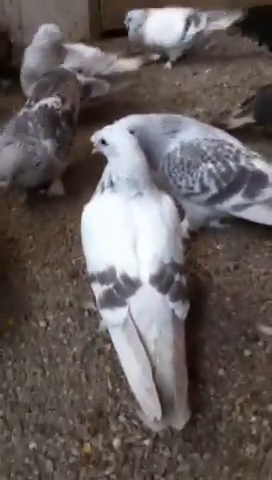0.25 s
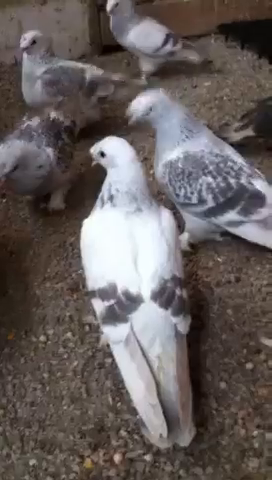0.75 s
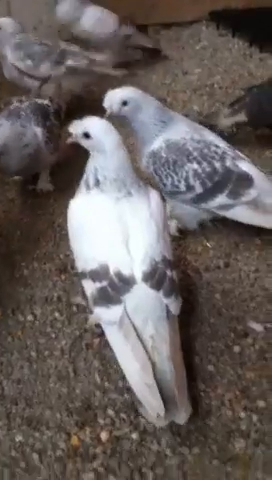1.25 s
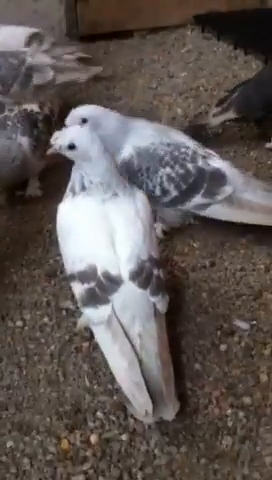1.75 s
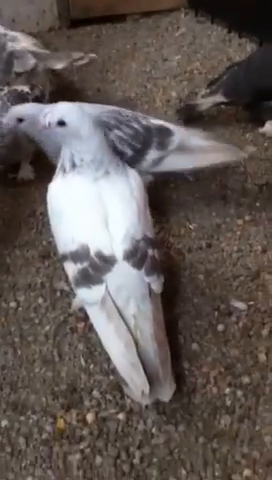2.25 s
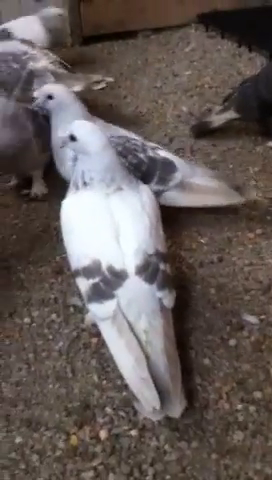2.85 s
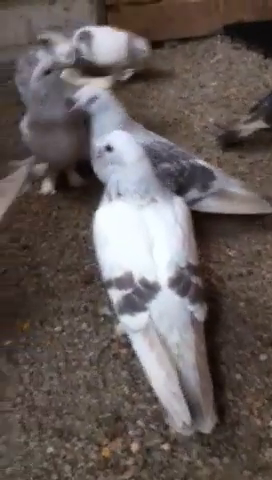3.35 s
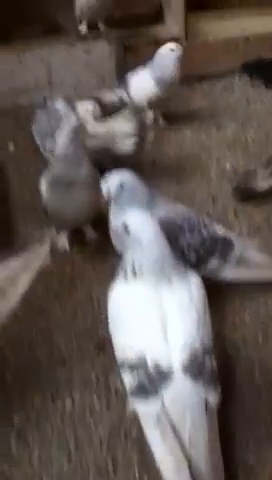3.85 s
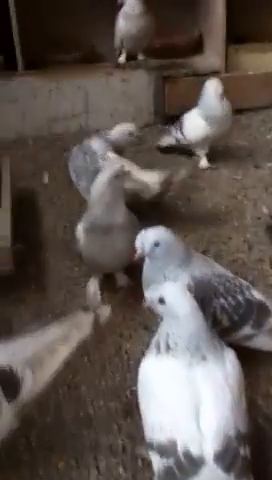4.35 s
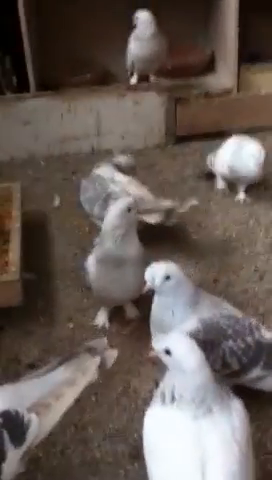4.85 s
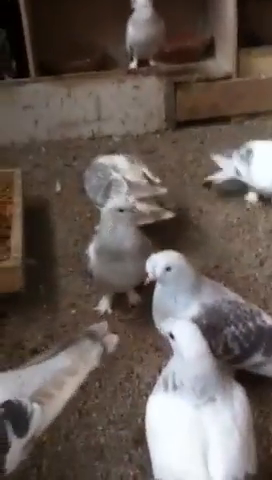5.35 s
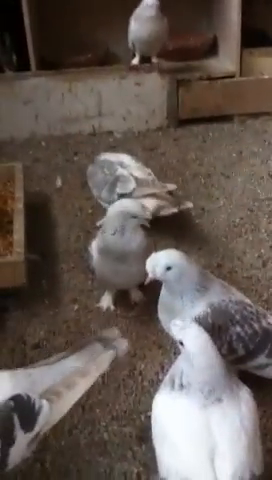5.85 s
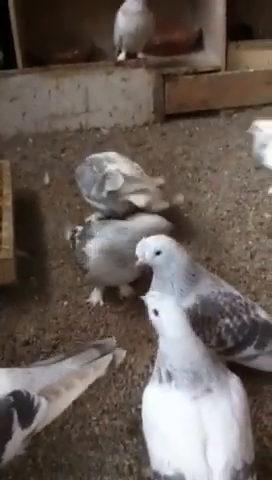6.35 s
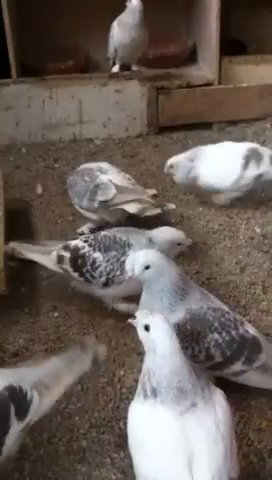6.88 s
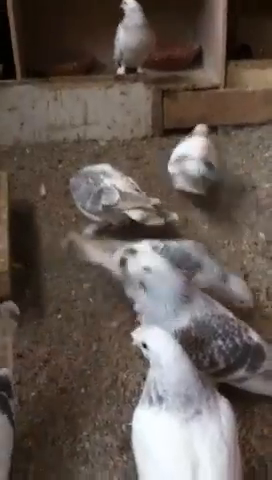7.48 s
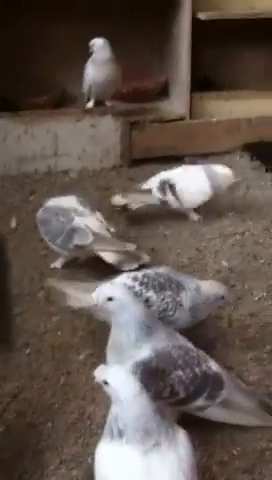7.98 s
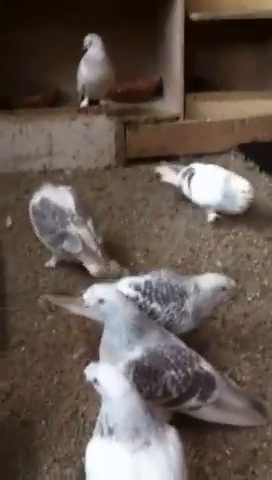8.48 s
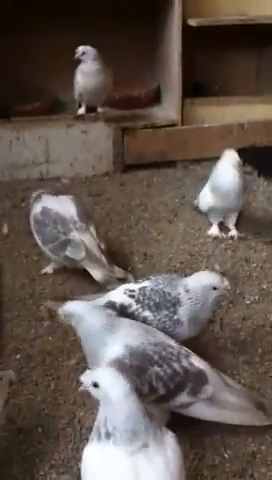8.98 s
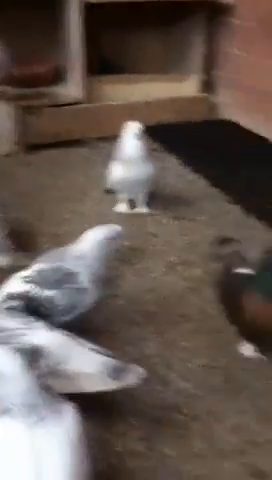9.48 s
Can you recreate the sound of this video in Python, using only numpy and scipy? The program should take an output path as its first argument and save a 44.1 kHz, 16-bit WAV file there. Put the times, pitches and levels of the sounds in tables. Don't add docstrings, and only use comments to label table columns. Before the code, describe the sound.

A quick volley of loud wing claps interrupts throaty pigeon cooing, which returns in rattling rolls over faint litter scuffs and dull air hum.

```python
import sys
import numpy as np
from scipy import signal
from scipy.fft import rfft, irfft
from scipy.io import wavfile
from scipy.ndimage import uniform_filter1d, minimum_filter1d

SR = 44100
rng = np.random.default_rng(int(sys.argv[2]) if len(sys.argv) > 2 else 0)


def gain_from_db(level_db):
    decades = np.asarray(level_db, float) / 20
    return 10 ** decades


def dump_mix(stems):
    frames = np.atleast_2d(stems).T
    limited = np.clip(frames, -1, 1)
    pcm = np.round(limited * 32767).astype(np.int16)
    wavfile.write(sys.argv[1], SR, pcm)


N = 428652

# [f/Hz, level/dB per Hz]
LITTER_COLOUR = [(100, -24), (250, -1.5), (1000, -2), (3600, -3), (5400, -4), (9400, -9.5), (16000, -22.5)]
FALL_S = 0.014


def evened(x):
    return x / np.sqrt(np.mean(x ** 2) + 1e-20)


def read(points, hz):
    f, value = np.transpose(points)
    return np.interp(np.log(hz + 1), np.log(f + 1), value)


def along(rows):
    s, *columns = np.transpose(rows)
    return [np.interp(np.arange(N) / SR, s, column) for column in columns]


def during(tables, fade):
    t = np.arange(N) / SR
    total = np.zeros(N)
    for rows in tables:
        start, end = rows[0][0], rows[-1][0]
        total += np.interp(t, [start - fade, start, end, end + fade], [0, 1, 1, 0])
    return total.clip(0, 1)


def add(mix, s, sound):
    part = mix[max(round(s * SR), 0):][:len(sound)]
    part += sound[:len(part)]


def wobble(count, hz):
    b, a = signal.butter(2, hz, fs=SR)
    drift = signal.lfilter(b, a, rng.standard_normal(count + 4000))
    return evened(drift[4000:])


def coloured(points, count, tilt_db=0, lumps_db=0):
    hz = np.fft.rfftfreq(count, 1 / SR)
    gain = gain_from_db(read(points, hz) + tilt_db * np.log2((hz + 700) / 5000))
    lumps = evened(uniform_filter1d(rng.standard_normal(len(hz)), size=25))
    spectrum = rfft(rng.standard_normal(count)) * gain * gain_from_db(lumps_db * lumps)
    return evened(irfft(spectrum, count))


def resonate(x, hz, width):
    b, a = signal.iirpeak(hz, hz / width, SR)
    return signal.lfilter(b, a, signal.lfilter(b, a, x))


def swelling(length, rise=.3):
    u = np.arange(round(2 * abs(length) * SR) + 8) / (rise * abs(length) * SR + 4)
    return u ** 2 * np.exp(2 - 2 * u)


def burst(length, clumps_db, rise):
    t = np.arange(round(.15 * SR)) / SR
    start = (1 - np.exp(-t / abs(rise))) ** 2
    return start * np.exp(-t / abs(length)) * gain_from_db(clumps_db * wobble(len(t), 500))


def loft(x, wet_db):
    # [f/Hz, time to fall 60 dB/s]
    echo_times = [(150, 0.33), (400, 0.32), (1000, 0.22), (2800, 0.16), (7300, 0.12), (15000, 0.054)]
    taps = np.zeros(SR // 2)
    at = np.arange(100, SR // 2 - 20, 20)
    taps[at + rng.integers(0, 20, len(at))] = rng.choice([-1., 1.], len(at))
    hz, t, z = signal.stft(taps, SR, nperseg=256)
    fading = gain_from_db(-60 * t / read(echo_times, hz)[:, None])
    tail = signal.istft(z * fading, SR, nperseg=256)[1]
    return x + gain_from_db(wet_db) * signal.fftconvolve(x, tail / np.linalg.norm(tail))[:N]


def air():
    # [f/Hz, level/dB per Hz]
    air_colour = [(20, -25.5), (70, -21.5), (141, 0.5), (230, -3), (500, -8), (1000, -7), (1650, -16),
                  (2100, -23), (6200, -28.5), (15600, -30.5), (16600, -50.5)]
    # [t/s, level/dB]
    stirring = [
        [(0.0, -68), (0.208, -62), (0.4, -58)],
        [(1.3, -52.5), (1.61, -63.5), (1.86, -72), (3.27, -66.5), (5.0, -74.5)],
        [(5.1, -59), (5.13, -67), (6.98, -71), (7.73, -61.5), (7.89, -68.5), (9.2, -77.5)],
        [(9.25, -64.5), (9.482, -67.5), (9.72, -67)],
    ]
    rustle_db = along(np.concatenate(stirring))[0] - 0.5 + 2.6 * wobble(N, 40)
    rustle = gain_from_db(rustle_db) * coloured(LITTER_COLOUR, N)
    return gain_from_db(-57 + .9 * wobble(N, 3.9)) * coloured(air_colour, N) + rustle


def litter():
    # [t/s, peak level/dB, treble tilt/dB per octave, length/s]
    scuffs = [(0.1903, -40, 6, 0.011), (1.656, -43.5, -4.5, 0.0101), (1.995, -50.5, 7, 0.0105),
              (2.216, -46, 1.5, 0.0239), (2.4029, -37.5, -10.5, 0.015), (2.5794, -48.5, 7.5, 0.0246),
              (2.729, -43, -0.5, 0.042), (2.835, -48.5, 1.5, 0.012), (3.122, -44.5, 11, 0.009),
              (3.82, -42, 17, 0.0097), (4.0209, -45.5, 5, 0.0159), (4.311, -44.5, 0, 0.02),
              (4.595, -38, 4.5, 0.014), (5.306, -42.5, 3, 0.0205), (5.347, -41, 1, 0.01),
              (6.2597, -34, 3.5, 0.022), (6.482, -47.5, 0.5, 0.02027), (6.592, -31.5, -0.5, 0.0138),
              (7.018, -45.5, 2, 0.025), (7.237, -32.5, -2, 0.0076), (7.262, -41, 2, 0.029),
              (7.333, -42.5, -2, 0.014), (7.523, -39, 1, 0.017), (7.634, -36.5, 0.5, 0.01155),
              (7.699, -41.5, 2.5, 0.032), (8.645, -48.5, 12.5, 0.0191), (5.5545, -34.5, -1, 0.0036),
              (9.277, -36, -3, 0.043), (9.35, -49, 1, 0.18), (9.665, -21.5, 16.5, 0.0046),
              (1.7394, -54.5, -1.5, 0.0061), (4.459, -51, 11.5, 0.0057), (4.506, -44.5, 0, 0.0092),
             (4.691, -53, 0, 0.008), (4.98, -49, 6, 0.008), (5.068, -56, 5, 0.008),
             (5.184, -42, 2.5, 0.0091), (5.474, -52.5, 5.5, 0.0058), (6.4, -47.5, 6.5, 0.0083),
             (7.005, -46.5, 0.5, 0.0074), (8.8184, -52, 1, 0.0083), (9.396, -45, 0, 0.0094),
             (9.564, -49.5, 2, 0.0079)]
    # [t/s, peak level/dB]
    pecks = [(1.4377, -35), (1.467, -41), (1.5275, -40), (1.956, -54), (2.1929, -44), (2.2248, -50),
             (2.913, -49), (3.172, -44), (5.095, -50), (5.1367, -45), (5.3064, -54)]
    # [f/Hz, level/dB, time to fall 60 dB/s]
    feeder = [(2400, -8, .008), (2900, -8, .008), (4250, -4, .007), (5500, -8, .005), (8200, -12, .004)]
    out = np.zeros(N)
    for s, db, tilt_db, length in scuffs:
        shape = burst(length, clumps_db=5.5, rise=0.028 * length)
        add(out, s - .001, gain_from_db(db - 14.5) * shape * coloured(LITTER_COLOUR, len(shape), tilt_db))
    t = np.arange(2000) / SR
    ring = sum(gain_from_db(db - 60 * t / t60) * np.sin(2 * np.pi * hz * t) for hz, db, t60 in feeder)
    for s, db in pecks:
        knock = evened(rng.standard_normal(300)) * np.exp(-t[:300] / 0.0054)
        add(out, s, gain_from_db(db - 18.5) * np.convolve(knock, ring))
    return out


def puffs():
    # [t/s, level/dB, centre f/Hz, length/s]
    brushes = [(2.092, -57, 77, .046), (6.595, -51, 1300, .006), (5.065, -61, 4000, .085),
               (5.22, -66, 4200, .04), (2.74, -54, 160, .076), (.99, -50, 180, .04), (5.26, -60, 157, .1),
               (5.888, -55, 1300, .012), (5.925, -60, 1550, .06), (9.3, -55, 400, .05),
               (9.362, -54, 1030, .03)]
    out = np.zeros(N)
    for s, db, hz, length in brushes:
        shape = swelling(length, rise=0.7)
        hiss = resonate(rng.standard_normal(len(shape)), hz, 0.29 * hz)
        add(out, s, gain_from_db(db + 3.6 * wobble(len(shape), 34)) * shape * evened(hiss))
    return out


def feather_hiss():
    # [t/s, level/dB]
    strength = [(.415, -47), (.425, -38), (.52, -44.5), (.8, -33.5), (1.2, -39), (1.3, -42.5), (1.45, -95)]
    # [f/Hz, level/dB per Hz]
    hiss_colour = [(59, -53.5), (100, -22), (353, -5.5), (714, -10.5), (903, -8), (1510, -17.5),
                   (14500, -26), (16500, -45.5)]
    hiss = gain_from_db(along(strength)[0] + 3.3 * wobble(N, 30)) * coloured(hiss_colour, N)
    return hiss * during([strength], fade=0.0084)


def wing_claps():
    # [t/s, peak level/dB, length of the slap/s, treble tilt/dB per octave]
    claps = [
        (0.534, -1, 0.014, 0),
        (0.649, -2, 0.012, -1.5),
        (0.7597, 0.5, 0.01268, 0),
        (0.8753, -3, 0.01, 0),
        (0.9457, -22.5, 0.0065, 1),
        (0.992, 1, 0.011, 0.5),
        (1.1125, -2, 0.0091, 2),
        (1.2375, -4, 0.0088, 0.5),
    ]
    # [f/Hz, level/dB per Hz]
    clap_colour = [(24, -35), (40, -16), (160, -28), (308, -4.5), (497, -5.5), (624, -5), (3290, -5),
                   (4800, -7.5), (13200, -13), (15300, -16), (16500, -49.5)]
    # [f/Hz, width/Hz, level/dB]
    boards = [(310, 40, -6), (490, 24, 5), (640, 40, -10), (855, 35, -4), (1100, 40, -3), (1380, 45, -4),
              (1890, 50, -3), (2370, 60, -6), (3160, 70, -4)]
    out = np.zeros(N)
    b, a = signal.butter(1, 110, "high", fs=SR)
    for s, db, length, tilt_db in claps:
        shape = burst(length, clumps_db=3, rise=.28 * length)
        slap = shape * coloured(clap_colour, len(shape), tilt_db, lumps_db=0.07)
        add(out, s - .002, gain_from_db(db - 24.5) * evened(signal.lfilter(b, a, slap)))
        push = swelling(0.031, rise=0.64)
        puff = evened(resonate(rng.standard_normal(len(push)), 317.4, 180))
        add(out, s - .018, gain_from_db(db - 35.0) * push * puff)
    return out + sum(gain_from_db(db) * resonate(out, hz, width) for hz, width, db in boards)


def blips(rows, start, rough, length=0):
    out = np.zeros(N)
    for s, db, hz, *own_length in rows:
        own = sum(own_length)
        span = length + own
        u = np.arange(round(2 * span * SR)) / (span * SR)
        shape = 1.8 * u ** 0.5 * np.exp(-(1.133 * u) ** 2.0)
        glide = 1 + (start - 1) * np.exp(-u / 0.19)
        turns = np.cumsum(hz * glide * (1 + rough * wobble(len(u), 106))) / SR
        strength = gain_from_db(db - 1.0 + 7.5 * rough * wobble(len(u), 79))
        add(out, s - .006 - 0.0406 * own, strength * shape * np.sin(2 * np.pi * turns))
    return out


def gulps():
    # [t/s, peak level/dB]
    gulp_times = [(1.844, -40.5), (2.114, -38.5), (2.226, -41.5), (2.335, -41), (2.683, -37), (3.14, -43.5),
                  (3.252, -35.5), (3.281, -37), (3.407, -44.5), (5.56, -44), (5.722, -44), (5.883, -42.5),
                  (6.862, -44.5), (7.046, -41), (7.111, -40.5), (7.783, -46.5), (8.085, -47.5),
                  (8.321, -40.5), (7.815, -53), (7.885, -43), (7.92, -43), (7.95, -46), (5.94, -57),
                  (5.97, -51), (5.999, -54), (3.17, -40), (3.306, -35)]
    return blips([(s, db, 228.7) for s, db in gulp_times], start=1.064, rough=0.041, length=0.032)


def bubbles():
    # [t/s, peak level/dB, f/Hz]
    bubble_notes = [(1.862, -38.5, 412.7), (3.076, -33, 403), (3.192, -32.5, 361.5), (5.232, -49.5, 375.5),
                    (5.292, -35.5, 356.2), (5.559, -32, 392), (5.58, -32, 353.5), (5.675, -36, 361),
                    (5.727, -34, 398), (5.823, -40, 422), (5.859, -35, 402), (5.895, -29.5, 434),
                    (6.029, -32.5, 366), (6.072, -31, 385), (6.54, -35, 399.6), (6.745, -36, 399.7),
                    (6.815, -40.5, 396), (6.863, -28.5, 375.6), (6.909, -37.5, 384), (6.99, -34, 356),
                    (7.036, -30.5, 370.6), (7.078, -31.5, 374.6), (7.102, -34.5, 406.4),
                    (7.928, -39.5, 372.5), (7.962, -44, 365.7), (5.325, -39.5, 355.7), (5.595, -38, 385),
                    (5.92, -33, 425), (5.44, -44, 399), (8.083, -28.5, 379), (8.196, -34, 370.8),
                    (8.252, -31.5, 386), (8.315, -30.5, 382.5), (8.346, -38.5, 419)]
    # [t/s, peak level/dB]
    low_bubbles = [(0.047, -34), (2.007, -38), (2.779, -40), (2.97, -35), (3.11, -36.5), (3.41, -33.5),
                   (6.121, -28), (6.643, -33.5), (6.679, -32.5), (7.883, -36), (7.95, -50), (7.99, -47),
                   (8.029, -39), (6.02, -31.5), (6.535, -40.5), (6.76, -44), (6.919, -40), (7.14, -36.5),
                   (7.795, -41), (8.062, -36), (8.457, -28)]
    rows = bubble_notes + [(s, db, 319) for s, db in low_bubbles]
    return blips(rows, start=0.99, rough=0.052, length=0.031)


def whoops():
    # [t/s, peak level/dB, end f/Hz, length/s]
    whoop_notes = [(0.044, -32.5, 540, 0.034), (1.891, -42.5, 623, 0.031), (2.23, -37, 530.5, 0.031),
                   (2.344, -34, 491, 0.04), (2.745, -40.5, 513.3, 0.077), (2.76, -43, 624, 0.064),
                   (2.968, -41.5, 527, 0.052), (3.119, -39, 550.8, 0.045), (3.375, -40.5, 569.6, 0.058),
                   (3.58, -42.5, 567.6, 0.045), (5.24, -50.5, 623.6, 0.039), (5.618, -37.5, 628.4, 0.052),
                   (5.769, -42, 652, 0.048), (6.589, -34, 622.7, 0.038), (6.913, -42, 562, 0.03),
                   (7.776, -38, 504.7, 0.04), (7.825, -33, 600, 0.0224), (8.133, -41.5, 626.5, 0.035),
                   (1.481, -42, 744.4, 0.04), (2.385, -42, 825, 0.057), (2.81, -35, 623.6, 0.024),
                   (6.56, -39.5, 530.1, 0.04), (5.6, -45, 533, 0.0385), (2.678, -44.5, 766, 0.047),
                   (3.143, -41, 686, 0.043)]
    return blips(whoop_notes, start=0.869, rough=0.07)


def roll():
    # [t/s, level/dB]
    bouts = [
        [(0.0, -41.5), (0.308, -35.5), (0.5, -37.5)],
        [(1.4, -66), (1.53, -55), (2.55, -35.5), (2.74, -44), (2.99, -48), (3.5, -41.5)],
        [(5.2, -58.5), (5.39, -54), (6.27, -37.5), (6.65, -46.5), (6.95, -47.5), (7.2, -45)],
        [(7.7, -53.5), (7.912, -49), (8.5, -42.5)],
    ]
    # [f/Hz, width/Hz, level/dB]
    crop = [(219, 48, -5), (312.5, 23, -0.5), (385, 84, -1.5), (470, 66, -4.5), (544, 92, -12)]
    pulse_hz = 95 * gain_from_db(4 * wobble(N + 1, 60))
    pulses = np.diff(np.floor(np.cumsum(pulse_hz) / SR)) * gain_from_db(3 * rng.standard_normal(N))
    rattle = np.zeros(N)
    for k, (hz, width, db) in enumerate(crop):
        rattle += (-1) ** k * gain_from_db(db) * resonate(pulses, hz, width)
    held = uniform_filter1d(effort()[1], 800)
    held_db = np.clip(20 * np.log10(held.clip(1e-6)) + 46, 0, 12)
    strength = gain_from_db(along(np.concatenate(bouts))[0] - 1.5 - 0.76 * held_db)
    return strength * during(bouts, fade=0.038) * evened(rattle)


def note(length, db, grow_db):
    t = np.arange(round((length + FALL_S) * SR)) / SR
    ends = np.clip(np.minimum(t / .014, (length - t) / FALL_S + 1), 0, 1)
    return ends * gain_from_db(db + grow_db * (t / length - 1.5))


def effort():
    # [start t/s, length/s, first f/Hz, last f/Hz, level/dB]
    hoots = [(0, 0.038, 434.4, 453, -40.5), (1.956, 0.087, 442.3, 440.4, -45.5),
             (2.148, 0.1706, 455.3, 424.2, -37.5), (2.951, 0.096, 407.2, 400, -45),
             (3.08, 0.049, 400, 405.4, -40), (6.69, 0.129, 400, 395, -45.5), (6.89, .05, 400, 398.7, -41),
             (3.269, 0.12, 392.6, 409, -40), (5.238, 0.119, 364.2, 355, -45),
             (5.39, 0.1493, 392.5, 366.6, -47.5), (5.961, 0.045, 435.6, 429.6, -33),
             (6.032, 0.085, 392, 394.8, -44), (7.898, 0.078, 364, 368.1, -43),
             (8.187, 0.15, 371.2, 402, -41)]
    # [t/s, f/Hz, level/dB]
    early_coos = [
        [(0.062, 401, -41), (0.092, 407.4, -36), (0.168, 401.4, -31.5), (0.234, 405.4, -42), (0.25, 403, -29.5),
         (0.262, 393, -50)],
        [(0.268, 430.2, -54), (0.28, 407, -33), (0.294, 407, -29), (0.314, 410, -39), (0.342, 406.3, -27),
         (0.37, 389.4, -49)],
        [(2.37, 417, -43), (2.372, 410.4, -50), (2.388, 412.5, -35.5), (2.466, 409.9, -36.5), (2.5, 416, -39),
         (2.526, 425.2, -37.5), (2.535, 434.5, -41)],
        [(2.54, 440.6, -39.5), (2.566, 436.7, -33), (2.6, 405.6, -31), (2.612, 404, -26.5), (2.64, 403, -37),
         (2.652, 395, -26.5), (2.68, 423, -36), (2.72, 403, -33), (2.73, 410, -50)],
        [(3.445, 379, -45), (3.477, 399, -40.5), (3.491, 391.8, -48), (3.513, 404, -41), (3.531, 395, -47.5),
         (3.567, 392, -38), (3.589, 376, -37), (3.615, 369.3, -40)],
    ]
    # [t/s, f/Hz, level/dB]
    late_coos = [
        [(6.145, 371, -42), (6.185, 371.3, -32.5), (6.235, 374, -33.5), (6.249, 376, -33), (6.275, 402.8, -41)],
        [(7.12, 393, -58), (7.144, 391.9, -35), (7.196, 395.7, -42), (7.218, 395, -36.5), (7.24, 390.8, -48),
         (7.245, 392, -58)],
        [(7.25, 381.6, -47), (7.262, 385.1, -33), (7.276, 384, -29), (7.292, 369, -39.5), (7.312, 369.3, -33),
         (7.38, 365, -33.5), (7.392, 382, -30.5), (7.405, 403, -46)],
        [(8.39, 392, -54), (8.436, 393, -36), (8.45, 387, -38.5), (8.504, 372, -34), (8.518, 349.5, -33),
         (8.548, 350, -46.5)],
        [(8.552, 361, -43.5), (8.58, 361.2, -34), (8.612, 374, -33), (8.62, 370.4, -47)],
        [(8.625, 414.8, -39.5), (8.647, 417, -32), (8.657, 414, -43.5), (8.675, 434.4, -43.5),
         (8.721, 435.5, -32), (8.735, 434, -41), (8.759, 436, -30.5), (8.81, 436.9, -39)],
    ]
    # [t/s, f/Hz, level/dB]
    swells = [
        [(0.372, 456, -46), (0.382, 457, -35.5), (0.408, 474, -32.5), (0.418, 474, -47), (0.432, 482, -38),
         (0.444, 475.1, -46), (0.45, 460.4, -39), (0.462, 410.6, -46.5), (0.47, 405, -49.5)],
        [(3.62, 425, -45), (3.634, 440.4, -36), (3.662, 451, -34), (3.746, 432, -36), (3.76, 431.7, -30),
         (3.856, 427.5, -33), (3.872, 423, -29), (3.88, 385, -36), (3.892, 380, -45.5)],
        [(6.28, 417.0, -35), (6.288, 415, -37.5), (6.324, 416, -28), (6.344, 435.6, -45), (6.358, 413.4, -33),
         (6.402, 414.7, -31), (6.418, 433.3, -44), (6.468, 420, -29), (6.495, 411.6, -44)],
        [(7.41, 422.6, -34), (7.416, 417, -51), (7.434, 426, -33), (7.456, 438.7, -34), (7.558, 440.5, -29),
         (7.584, 444.1, -32), (7.612, 419.7, -28.5), (7.626, 397.5, -30), (7.66, 395.9, -34)],
        [(8.812, 440, -33), (8.849, 440, -39.5), (8.87, 420.8, -38.5), (8.891, 392.3, -27),
         (8.91, 384.8, -36.5)],
    ]
    main, knots = np.zeros(N), []
    for s, length, first_hz, last_hz, db in hoots:
        add(main, s, note(length, db, grow_db=4))
        knots += [(s, first_hz), (s + length, last_hz)]
    for rows in early_coos + late_coos + swells:
        main = np.maximum(main, gain_from_db(along(rows)[1] + 1.23) * during([rows], fade=.008))
        knots += [row[:2] for row in rows]
    t = np.arange(SR // 4) / SR
    for rows in swells:
        end = rows[-1][0]
        add(main, end, np.minimum(t / FALL_S, 1) * gain_from_db(-42 - 150 * t))
        knots += [(end + .012, 392), (end + .04, 392)]
    return along(sorted(knots))[0], main


def growls(turn):
    # [start t/s, length/s, f/Hz, level/dB, mirror level/dB]
    growl_notes = [
        (0.404, 0.037, 354.8, -39, -13),
        (3.743, 0.15, 343, -37, -7),
        (6.335, 0.1294, 338.2, -32, -10.5),
        (7.449, 0.091, 330.6, -41.5, -11),
        (7.545, 0.086, 346.3, -30.5, -13),
        (8.679, 0.057, 333.4, -44.5, -19.5),
        (8.815, 0.11, 330, -37, -18),
    ]
    out = np.zeros(N)
    for s, length, hz, db, mirror_db in growl_notes:
        shape = note(length, db, grow_db=1.5)
        own = 2 * np.pi * np.cumsum(hz * (1 + .07 * wobble(len(shape), 70))) / SR
        beside = turn[round(s * SR):][:len(shape)]
        both = np.sin(own) + gain_from_db(mirror_db) * np.sin(2 * beside - own) + gain_from_db(-17) * np.sin(beside / 2)
        add(out, s, shape * gain_from_db(0.87 * wobble(len(shape), 40)) * both)
    return out


def coos():
    # [t/s, peak level/dB]
    throbs = [(2.122, -33), (2.223, -31.5), (2.288, -30), (3.284, -32), (3.904, -38.5), (6.312, -22),
              (6.351, -32), (6.459, -27), (7.555, -32), (7.583, -31), (7.612, -24), (8.822, -26.5),
              (8.849, -29), (8.923, -36)]
    hz, held = effort()
    bumps, shut_db = np.zeros(N), np.zeros(N)
    for s, db in throbs:
        add(bumps, s - .012, gain_from_db(db - 5.0) * swelling(0.028, rise=0.69))
        add(shut_db, s - .02, -8 * signal.windows.hann(round(.022 * SR)))
    main = np.maximum(held * gain_from_db(shut_db + 0.4 * wobble(N, 38)), bumps)
    turn = 2 * np.pi * np.cumsum(hz * (1 + .005 * wobble(N, 28))) / SR
    faint_turn = 2 * np.pi * np.cumsum(328 * (1 + 0.055 * wobble(N, 60))) / SR
    faint = gain_from_db(-27.5) * np.sin(faint_turn)
    fifth = gain_from_db(-25.0 + 2.1 * wobble(N, 18)) * np.sin(1.5 * turn)
    low = gain_from_db(-17 + .4 * np.minimum(hz - 435, 0)) * np.sin(turn / 2)
    voice = main * (np.sin(turn) + fifth) + held * (low + faint)
    return np.sqrt(2) * (voice + gain_from_db(0.205 * shut_db) * growls(turn))


def scene():
    voices = coos() + roll() + bubbles() + gulps() + whoops()
    near = gain_from_db(-1.5) * loft(voices, wet_db=-14)
    far = loft(wing_claps(), wet_db=-6.5) + loft(litter(), wet_db=-1.0)
    return (near + far + feather_hiss() + puffs() + air())[None]


def roll_off(x):
    return signal.sosfilt(signal.butter(12, 17000, fs=SR, output="sos"), x)


def record(dry):
    x = signal.sosfilt(signal.butter(1, 60, "high", fs=SR, output="sos"), dry)
    treble = signal.sosfiltfilt(signal.butter(4, 2200, "high", fs=SR, output="sos"), x)
    level_db = 10 * np.log10(abs(uniform_filter1d(treble[0] ** 2, 130)) + 1e-14)
    coming_db = -minimum_filter1d(-np.roll(level_db, -330), 300)
    sudden = np.clip((coming_db - level_db - 23) / 3, 0, 1)
    mute = uniform_filter1d(sudden * (coming_db > -30), 60)
    rounded = .75 * np.tanh((x - mute * treble) / .75)
    mix = signal.oaconvolve(rounded, signal.firwin(255, 16800, fs=SR)[None], "same")
    return roll_off(mix)


dry = scene()
out = record(dry)
dump_mix(out)
```